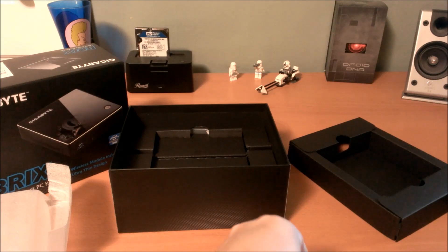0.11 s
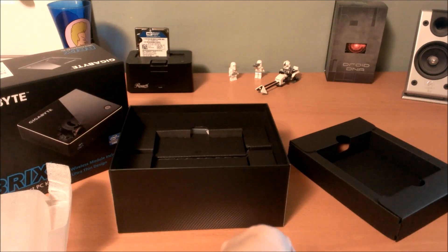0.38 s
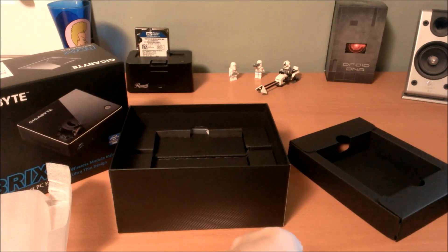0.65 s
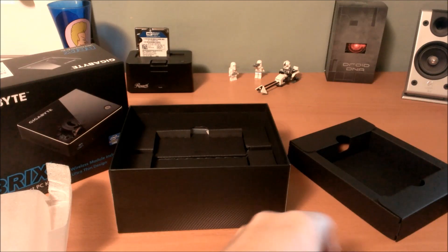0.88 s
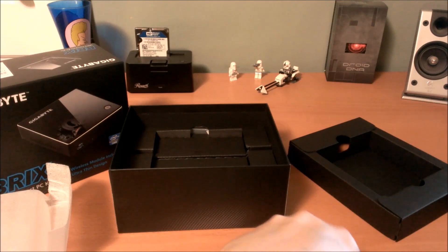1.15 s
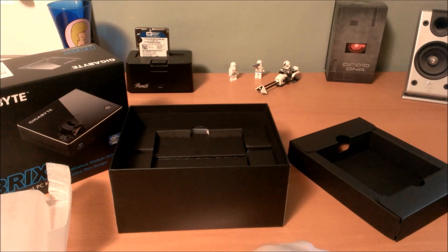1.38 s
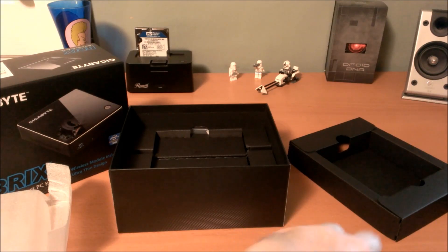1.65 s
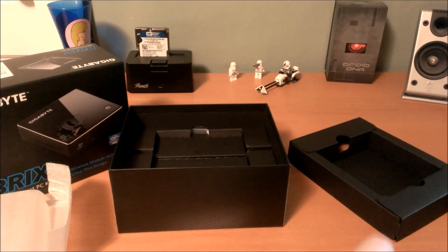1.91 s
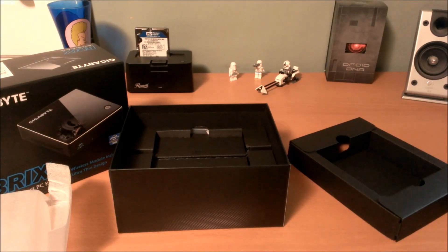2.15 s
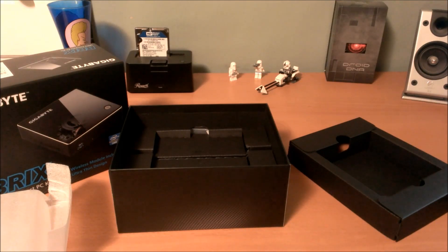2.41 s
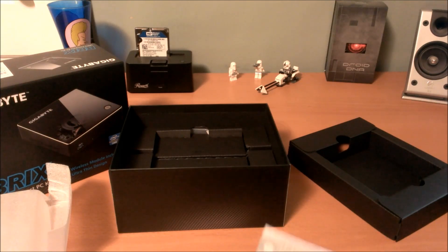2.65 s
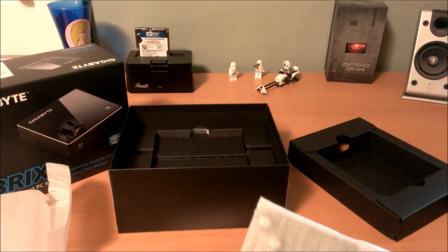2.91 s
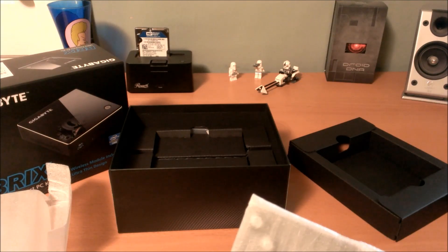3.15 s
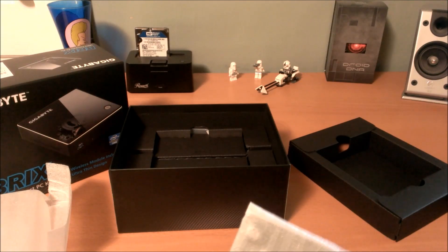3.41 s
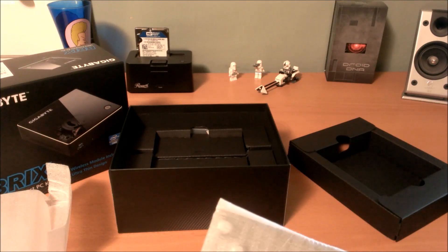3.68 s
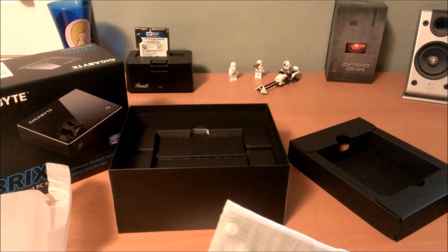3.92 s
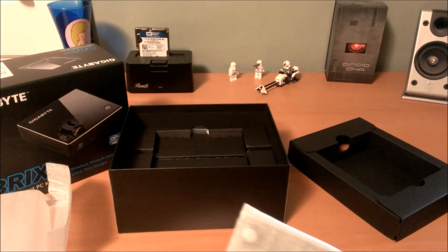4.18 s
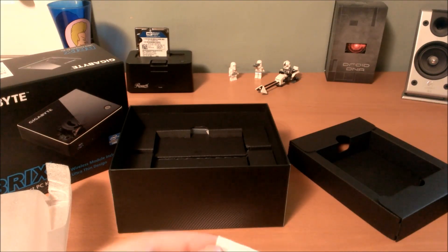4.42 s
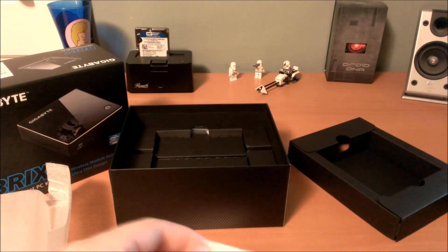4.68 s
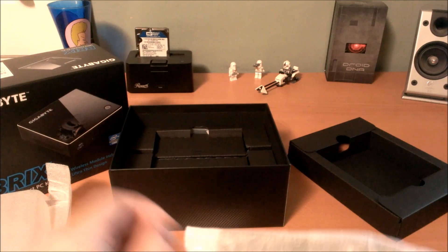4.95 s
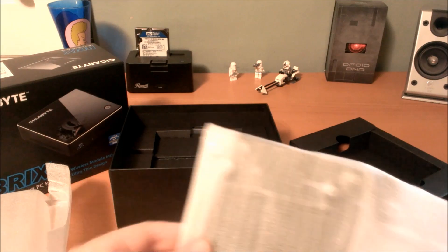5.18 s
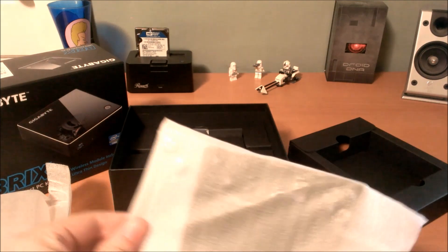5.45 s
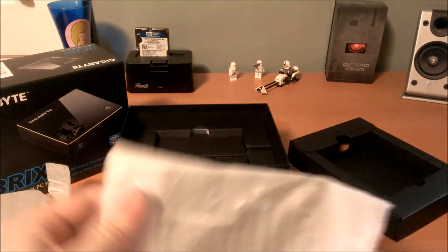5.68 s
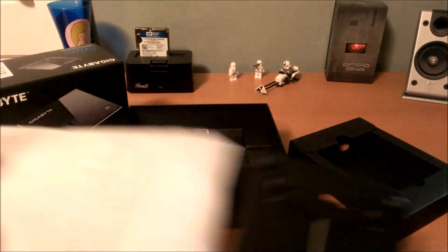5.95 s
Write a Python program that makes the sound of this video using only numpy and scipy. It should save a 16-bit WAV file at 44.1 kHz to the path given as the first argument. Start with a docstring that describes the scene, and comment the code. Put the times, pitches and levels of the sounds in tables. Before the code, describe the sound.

A close, quiet indoor stereo scene of hands turning a foam packing sleeve over a desk, with soft low ventilation and slight hiss beneath. From 0 to 2.4 s, dry bright crackling comes in short uneven strokes, several a second, with small sharp crease snaps near 0.8, 1.0 to 1.4 and 1.8 s. At about 2.4 s a metal plate knocks in a rapid run of six blows lasting a tenth of a second, ringing briefly while its edge scrapes, then is damped. From 2.6 to 4.7 s the rustle is mostly softer and more flexing, with scattered ticks. A crisp stroke lands at 4.8 s, stronger crinkling with a hard snap around 5.4 to 5.5 s, dull bumps near 5.7 to 5.8 s, and the loudest crackling burst from 5.95 s to the end. Echoes are short and faint; the left is brighter than the right.

```python
"""Soft dry crackling comes first, in short strokes over low ventilation noise: hands turn a foam sleeve above a desk.
The strokes are random clicks and briefly ringing panels; creases snap as noise bursts with a short ring.
About 2.4 s in, a metal plate inside knocks in a quick run of blows on ringing modes, and its edge scrapes.
Two unlike microphone ports, one bright and one dull, out of phase above the bass, pick it up in a quiet room,
with the echoes well below the direct sound."""
import sys
import numpy as np
from scipy import signal
from scipy.fft import rfft, irfft
from scipy.io import wavfile

SR = 44100
rng = np.random.default_rng(int(sys.argv[2]) if len(sys.argv) > 2 else 0)


def volts(x):
    """Linear amplitude factor 10**(x/20) for a level x in dB, scalar or array-like."""
    e = np.asarray(x, float) / 20
    return 10 ** e


def unload_audio(sound):
    """Save the sound as a 16-bit wav file, at the path given as the first command line argument."""
    columns = np.transpose(np.atleast_2d(sound))
    # keep every value between -1 and 1, then stretch to whole-number steps
    steps = np.round(np.clip(columns, -1, 1) * 32767)
    wavfile.write(sys.argv[1], SR, steps.astype(np.int16))


N = 267830

# Moves of the sleeve in the hands: full_strength_s, hold_s, crackle_level_db,
# rise_ms (for 20 dB, at least 1), flexing_above_crackle_db
SLEEVE_MOVES = [(0.028, .002, -50.5, 62, -5), (0.082, 0.031, -47.5, 56, -9.5),
                (0.185, 0.083, -52.5, 53, -9), (0.318, .11, -56, 100, -10), (.47, 0.066, -68.5, 60, -13),
                (0.58, .002, -66, 11, -4), (.658, .06, -62.5, 50, -11), (0.748, 0.049, -41, 45, -8),
                (0.9, .005, -53, 100, -5.5), (0.983, .08, -46.5, 41, -7.5), (1.06, 0.059, -45, 17, -6),
                (1.175, .02, -43.5, -2, -9.5), (1.259, .04, -50.5, 44, -8), (1.318, 0.066, -45, 80, -3.5),
                (1.47, 0.054, -48, 133, -7.5), (1.566, 0.0034, -45, 56, -8),
                (1.649, 0.065, -54.5, 90, -0.5), (1.769, .04, -47, 150, -8.5), (1.85, .04, -51.5, 40, -6),
                (1.944, .07, -48.5, 100, -8), (2.085, 0.011, -51.5, 124, -5), (2.15, .01, -52.5, 41, -9),
                (2.198, 0.075, -51, 120, -6.5), (2.369, 0.05, -43.5, 206, -7),
                (2.473, 0.097, -44.5, 37, -4), (2.615, 0.095, -64, 60, 2.5), (2.758, .08, -61.5, 30, 0),
                (2.862, .06, -44.5, 50, -11), (2.951, 0.023, -54, 60, -0.5), (3.021, 0.0092, -55, 86, 0),
                (3.07, .01, -69, 40, 12), (3.131, 0.0017, -57.5, 69, 1), (3.243, 0.027, -52.5, 21, -2.5),
                (3.395, 0.072, -53.5, 20, -5.5), (3.534, .05, -51, 83, -7.5), (3.628, 0.076, -59.5, 80, -5),
                (3.725, .002, -43.5, 53, -10.5), (3.777, 0.13, -57, 80, -0.5), (3.921, .02, -55, 202, -1.5),
                (4.062, 0.035, -58.5, 54, -0.5), (4.181, 0.041, -61, 8, 2.5),
                (4.258, 0.023, -53.5, 130, -6), (4.312, 0.011, -54, 40, -10),
                (4.359, 0.083, -52.5, 21, -6.5), (4.455, 0.014, -46.5, 50, -23),
                (4.54, 0.13, -67.5, 60, -9), (4.797, 0.02, -37, 15.5, -6), (4.944, 0.044, -50, 16, -7),
                (5.006, .002, -50, 15, -2), (5.049, 0.0092, -56, 36, -10), (5.073, 0.038, -70.5, 62, -10),
                (5.26, 0.028, -48, 17, -11.5), (5.36, .06, -50.5, 76, -18), (5.422, 0.029, -36, 35, -7),
                (5.475, 0.0037, -33.5, 87, -6), (5.54, 0.021, -48.5, 60, -11), (5.598, .002, -51.5, 37, -9),
                (5.663, 0.03, -43, 37, -11), (5.789, .08, -52.5, 4, -11), (5.896, .02, -53, 63, -14),
                (5.945, 0.014, -26.5, 27.5, -8), (5.991, 0.048, -27.5, 55, -23)]
# Colour of the foam's ticking ahead of the ports: frequency_hz, level_db
CRACKLE_COLOUR = [(300, -24), (1500, -22), (3000, -10), (6000, -0.5), (10000, 5.5), (16000, -3)]
# Colour of the flexing panels ahead of the ports: frequency_hz, level_db
FLEXING_COLOUR = [(300, -4.5), (800, -6), (1500, 0.5), (3000, 1), (5000, 8.5), (8000, 8.5), (16000, -16)]
# Crackle's top treble, perhaps as the sheet turns to or from the microphone: time_s, gain_db
TOP_TREBLE_GAIN = [(0, 0.1), (.5, 0), (1.1, 3.5), (1.8, 1.5), (2.5, 0.5), (2.9, -3), (3.6, -3), (4.4, 2.5),
                   (4.9, -2.5), (5.4, -5), (5.75, 0.5), (6.07, -5)]
# Creases snapping, and one light tick of the plate near 1.8 s: start_s, peak_db (bright part, ahead of the
# ports), ring_above_bright_db, ring_hz, decay_ms
CREASE_SNAPS = [(0.023, -45, -8, 3720, 5.4), (0.758, -29, -19, 4410, 1.5), (0.9727, -42, 2, 5130, .8),
                (1.058, -31, -20, 4640, 2.4), (1.1, -45, -6, 3720, 1.5), (1.1787, -31, -13, 3180, 1.7),
                (1.1846, -32, -16, 3690, 1.1), (1.3119, -30.5, 7, 4240, 2.3), (1.3574, -37, 2, 4640, 1.1),
                (1.3686, -33.5, -6, 4030, 1.1), (1.799, -40.5, 3.5, 3740, 3), (2.8514, -47, -2, 3100, 1.1),
                (2.898, -38, -15, 4000, 2.8), (3.7285, -36.5, -12, 4840, 2.7), (4.241, -38, -4, 5100, 1.3),
                (4.244, -40, 8, 4460, 1.3), (4.362, -42, -9, 3500, 1.2), (4.453, -42, -18, 5040, 4),
                (4.823, -30, -1, 4600, 0.92), (4.9432, -48, -8, 5440, 1.1), (5.011, -29.5, -6, 3550, 1.5),
                (5.04, -35, -18, 3300, .6), (5.1925, -54, -28, 4450, 0.73), (5.279, -40, -15, 4000, 2),
                (5.4835, -23, -6, 3870, 4.3), (5.684, -33, -14, 3160, 7.2), (5.8017, -45, -11, 3410, 3.0),
                (5.8154, -37.5, -14, 2940, 7.2), (5.876, -46, -17, 4000, 1.5), (5.9479, -21, -7, 4480, 1.5),
                (5.967, -22, -20, 4770, 2.8), (6.0164, -22, -22, 4410, 1.1)]
# Plate striking the desk: start_s, level_db, contact (0 corner to 1 edge)
PLATE_BLOWS = [(2.4155, -34, .01), (2.427, -33, .01), (2.454, -42.5, 0.46), (2.47, -43, 0.9),
               (2.484, -36, 0.84), (2.512, -42.5, 0.57)]
# Ringing modes of the plate: frequency_hz, corner_level_db, edge_level_db, t60_s
PLATE_MODES = [(289, -8.5, -22, 0.15), (426, -13.5, -22, 0.49), (923, -4, -6, 0.067), (1204, -21, -9, 0.15),
               (1550, -30, -3, 0.17), (1720, -16, -10, 0.24), (1803, -6, -15, .2), (1940, -24, -20, 0.092),
               (2086, -33, 0.5, 0.58), (2360, -22, -9, 0.15), (2570, -19, -9, 0.12),
               (2590, -28, -22, 0.096), (2800, -9.5, -16, 0.21), (3290, -33, -27, 0.18),
               (3576, -13.5, -17, 0.41), (4010, -23, -10, 0.28), (4371, -15, -15, 0.18),
               (4700, -33, -22, 0.12), (5180, -8, -3, 0.11), (5970, -28, -16, 0.16), (5840, -34, -14, 0.21),
               (6770, -16, 0, 0.1), (7150, -16, -16, 0.12), (8260, -22, -17, 0.089)]
# Plate's edge dragged over the desk: time_s, level_db
EDGE_DRAG = [(2.414, -54), (2.419, -36), (2.44, -41), (2.485, -37.5), (2.53, -53.5), (2.56, -50.5),
             (2.6, -69), (2.66, -64)]
# Colour of the scrape ahead of the ports: frequency_hz, level_db
SCRAPE_COLOUR = [(60, -18), (110, -1), (250, -9), (550, -9.5), (1000, 0), (1350, -0.5), (1700, 4.5),
                 (2400, 0), (3000, -3.5), (3500, -10), (4500, -5.5), (6000, -13.5), (16000, -49)]
# Soft bumps through the desk: start_s, level_db (ahead of the filters), contact_cutoff_hz
DESK_THUMPS = [(2.415, -18, 1100), (5.69, -28.5, 298), (5.799, -33, 500), (5.815, -31, 500),
               (5.962, -25, 400)]
# Colour of the ventilation ahead of the ports: frequency_hz, level_db
AIR_COLOUR = [(25, -24), (60, -25), (110, -5), (180, -4.5), (270, 2.5), (400, -7.5), (700, -7.5),
              (1200, -12.5), (2500, -19), (5000, -28), (9000, -46), (16000, -37)]
# How alike the air noise is at both ports: frequency_hz, likeness (share of power, 0 to 1)
AIR_LEFT_RIGHT_LIKENESS = [(25, .1), (60, 0.61), (250, 0.91), (500, 0.46), (1000, 0.24), (2000, 0.086),
                           (5000, 0.035)]
# Response of the bright left microphone port: frequency_hz, gain_db
LEFT_PORT_RESPONSE = [(2000, 1.63), (3500, 3.1), (5500, 2.5), (7000, 6.3), (8000, 11.7), (9000, 15.65),
                      (10000, 8.7), (11500, 3.8), (13500, 12.1), (15000, 7.1), (16000, 14.3)]
# Response of the dull right microphone port: frequency_hz, gain_db
RIGHT_PORT_RESPONSE = [(60, 0.5), (250, 0), (600, -1), (1200, 0.5), (2200, 2.5), (3000, 8), (3700, 11),
                       (4600, 5.5), (6000, -3.5), (8000, -10.5), (11000, -11), (16000, -7)]


def sleeve():
    """Foam cells tick past each other in clumps, denser in hard strokes; flexing panels ring briefly and lower."""
    usual_crackle_db = -54.5
    crackle_db = handling(fall_db_per_s=300, rest_db=-92.5, flexing=False)
    flex_db = handling(fall_db_per_s=280, rest_db=-74, flexing=True)
    clumps_db = 4.0 * drift(60)
    stroke_db = 0.35 * (crackle_db - usual_crackle_db)
    busy = np.clip(volts(clumps_db + stroke_db), 0.4, 6)

    ticks = grains(5000 * busy, spread_db=2.0, max_lag_s=0.0004)
    crackle = unit_band(ports(colour(ticks, CRACKLE_COLOUR)), 4400, 19900)
    treble = signal.butter(3, 12900, "high", fs=SR, output="sos")
    top = signal.sosfiltfilt(treble, crackle)
    crackle = crackle + (volts(in_time(TOP_TREBLE_GAIN)) - 1) * top

    panels = 0
    for hz in np.geomspace(500, 6500, 12):   # each panel size comes and goes on its own
        kicks = grains(900 * busy, spread_db=1.4, max_lag_s=0.0002)
        kicks = kicks * volts(2.2 * drift(26))
        panels = panels + resonance(kicks, hz, width_hz=0.24 * hz) / np.sqrt(hz)
    flexing = unit_band(ports(colour(panels, FLEXING_COLOUR)), 1500, 8700)
    return volts(crackle_db) * crackle + volts(flex_db) * flexing


def handling(fall_db_per_s, rest_db, flexing):
    """Level in dB of all moves together: each rises, sags while held, dies when let go and settles slowly."""
    sag_db_per_s = 30
    settle_db, settle_fall_db_per_s = -16, 99   # the sheet creeps back after each move
    t = np.arange(0, N + 44, 44) / SR   # about every millisecond
    peak_s, hold_s, level_db, rise_ms, flex_db = np.transpose(SLEEVE_MOVES)[:, :, None]
    since = t - peak_s
    hold_s = np.maximum(hold_s, 0)
    let_go = np.maximum(since - hold_s, 0)
    rise = 20 * np.minimum(since, 0) * 1000 / np.maximum(rise_ms, 1)
    sag = -sag_db_per_s * np.clip(since, 0, hold_s)
    fall = np.maximum(-fall_db_per_s * let_go, settle_db - settle_fall_db_per_s * let_go)
    move_db = level_db + flexing * flex_db + rise + sag + fall
    power = (volts(move_db) ** 2).sum(0) + volts(rest_db) ** 2
    return np.interp(np.arange(N) / SR, t, 10 * np.log10(power))


def snaps():
    """A crease gives way, or near 1.8 s the plate ticks, in a sharp burst, and a panel rings for a few
    milliseconds."""
    attack_share = 0.2   # of the decay time
    right_delay = 8   # samples
    t = np.arange(1300) / SR
    out = np.zeros((2, N + 1400))
    thin = signal.butter(2, [5200, 12500], "band", fs=SR, output="sos")
    for start_s, peak_db, ring_db, ring_hz, decay_ms in CREASE_SNAPS:
        at = round(start_s * SR)
        age = t * 1000 / max(decay_ms, 0.2)   # in decay times
        burst = rng.standard_normal(len(t)) * np.exp(-age) * np.minimum(age / attack_share, 1)
        bright = signal.sosfilt(thin, burst)
        ring = resonance(burst, ring_hz, width_hz=460)
        sound = bright / abs(bright).max() + volts(ring_db) * ring / abs(ring).max()
        sound = volts(peak_db) * sound
        out[0, at:at + len(t)] += sound
        out[1, at + right_delay:at + right_delay + len(t)] += sound
    return ports(out[:, :N])


def plate():
    """The edge bounces on the desk, ringing the modes until the fingers damp them, and scrapes in dense slips."""
    grip_s, grip_decay_s = 2.53, 0.014   # the fingers close on the plate
    t = np.arange(N) / SR
    moving = (t > EDGE_DRAG[0][0]) & (t < EDGE_DRAG[-1][0])
    slips = grains(np.full(N, 12000.0), spread_db=1.5, max_lag_s=0.00012)
    scrape = unit_band(ports(colour(slips, SCRAPE_COLOUR)), 600, 6300)
    scrape = scrape * volts(in_time(EDGE_DRAG)) * moving

    ring = np.zeros(N)
    start_s, blow_db, contact = np.transpose(PLATE_BLOWS)
    for hz, corner_db, edge_db, t60_s in PLATE_MODES:
        mode_db = corner_db + np.clip(contact, 0, 1) * (edge_db - corner_db)
        chance_db = rng.normal(0, 1.0, len(start_s))
        clicks = np.full(N, 1e-18)
        clicks[(start_s * SR).astype(int)] = volts(blow_db + mode_db + chance_db)
        r = volts(-60 / (t60_s * SR))   # decay per sample
        w = 2 * np.pi * hz / SR
        ring += signal.lfilter([0, np.sin(w)], [1, -2 * r * np.cos(w), r * r], clicks)
    ring *= np.exp(-np.maximum(t - grip_s, 0) / grip_decay_s)

    heard = scrape + ports([ring, np.roll(ring, 4)])   # right port 4 samples later
    no_bass = signal.butter(4, 120, "high", fs=SR, output="sos")   # the plate's sounds carry no deep bass
    return signal.sosfilt(no_bass, heard)


def thumps():
    """A short shove shakes the desk top, which sounds low and dull."""
    decay_s = 0.0087
    out = np.zeros(N)
    t = np.arange(N) / SR
    for start_s, level_db, cutoff_hz in DESK_THUMPS:
        fade = np.exp(-np.maximum(t - start_s, 0) / decay_s) * (t > start_s)
        shove = volts(level_db) * rng.standard_normal(N) * fade
        out += signal.sosfilt(signal.butter(2, cutoff_hz, fs=SR, output="sos"), shove)
    out = signal.sosfilt(signal.butter(4, 100, "high", fs=SR, output="sos"), out)
    return ports([out, out])


def room(pair):
    """Desk and wall echoes: a dying, dulling noise tail of its own for each side."""
    t60_s, echo_db, wall_cutoff_hz = 0.14, -12.5, 2540
    t = np.arange(int(0.4 * SR)) / SR
    tail = rng.standard_normal((2, len(t))) * volts(-60 * t / t60_s) * (t > 0.002)
    tail = signal.sosfilt(signal.butter(1, wall_cutoff_hz, fs=SR, output="sos"), tail)
    tail /= np.sqrt((tail ** 2).sum(1, keepdims=True))   # unit energy
    return volts(echo_db) * signal.fftconvolve(pair, tail, axes=1)[:, :N]


def ventilation():
    """Steady air noise: broad random pressure, more alike at both ports in the bass than in the treble."""
    level_db = -62
    shared, left, right = colour(rng.standard_normal((3, N)), AIR_COLOUR)
    hz = np.maximum(np.fft.rfftfreq(N, 1 / SR), 1)
    alike = np.clip(at_hz(AIR_LEFT_RIGHT_LIKENESS, hz), 0, 1)
    common = np.sqrt(alike) * rfft(shared)
    separate = np.sqrt(1 - alike) * rfft([left, right])
    air = unit_band(ports(irfft(common + separate, N)), 74, 5500)
    return volts(level_db) * air * volts(0.085 * drift(5.1))


def ports(pair):
    """Each port has its own cavity resonance; an all-pass turns the left side upside down above the bass."""
    turn_hz = 56.4
    a = np.exp(-2 * np.pi * turn_hz / SR)
    left = signal.lfilter([-a, 1], [1, -a], pair[0])
    return np.vstack([colour(left, LEFT_PORT_RESPONSE), colour(pair[1], RIGHT_PORT_RESPONSE)])


def grains(per_s, spread_db, max_lag_s):
    """Random clicks from spots across the sheet, each spot with its own lag between the ports."""
    sizes = volts(spread_db * np.minimum(rng.exponential(1, N), 5)) * rng.choice([-1, 1], N)
    clicks = sizes * (rng.random(N) < per_s / SR) / np.sqrt(per_s)   # even power at any density
    spot = rng.integers(0, 9, N)
    lags = np.linspace(-max_lag_s, max_lag_s, 9) * SR
    right = sum(np.roll(clicks * (spot == k), round(lag)) for k, lag in enumerate(lags))
    return np.array([clicks, right])


def resonance(x, hz, width_hz):
    """Two-pole resonance, gain 1 on top."""
    r = np.exp(-np.pi * width_hz / SR)
    poles = [1, -2 * r * np.cos(2 * np.pi * hz / SR), r * r]
    return signal.lfilter([(1 - r * r) / 2, 0, (r * r - 1) / 2], poles, x)


def drift(rate_hz):
    """Slow chance, spread 1: noise through two equal one-pole low-passes."""
    r = np.exp(-2 * np.pi * rate_hz / SR)
    slow = signal.lfilter([1], [1, -2 * r, r * r], rng.standard_normal(N + SR))[SR:]
    return slow / slow.std()


def colour(x, points):
    """Causal (minimum-phase) filter with the given spectrum."""
    hz = np.maximum(np.fft.rfftfreq(4096, 1 / SR), 1)
    cepstrum = irfft(np.log(volts(at_hz(points, hz))))
    cepstrum[1:2048] *= 2   # fold the cepstrum onto positive time
    cepstrum[2049:] = 0
    impulse = irfft(np.exp(rfft(cepstrum)))[None, :2048]
    return signal.fftconvolve(np.atleast_2d(x), impulse, axes=1)[:, :N]


def unit_band(pair, low_hz, high_hz):
    """Scales a pair so that its middle has rms 1 in the band."""
    band_pass = signal.butter(4, [low_hz, high_hz], "band", fs=SR, output="sos")
    return pair / signal.sosfilt(band_pass, pair.mean(0)).std()


def in_time(rows):
    """Joins the points of a (time_s, level_db) table with straight lines."""
    time_s, level_db = np.transpose(rows)
    return np.interp(np.arange(N) / SR, time_s, level_db)


def at_hz(points, hz):
    """Reads a table keyed by frequency at the given hz, along log frequency."""
    table_hz, values = np.transpose(points)
    return np.interp(np.log(hz), np.log(table_hz), values)


def scene():
    """Everything on the desk, its echoes and the room air."""
    desk = sleeve() + snaps() + plate() + thumps()
    return desk + room(desk) + ventilation()


def top_cut(x):
    """Nothing passes above the cut-off."""
    return signal.sosfilt(signal.butter(12, 16840, fs=SR, output="sos"), x)


def record(dry):
    """The preamplifiers add hiss, stronger on the right, and a steep low-pass cuts the top."""
    hiss_db = [[-96], [-78]]   # left, right
    noisy = dry + volts(hiss_db) * rng.standard_normal((2, N))
    low_pass = signal.cheby2(12, 32, 15950, fs=SR, output="sos")
    mix = signal.sosfilt(low_pass, noisy)
    return top_cut(mix)


dry = scene()
out = record(dry)
unload_audio(out)
```